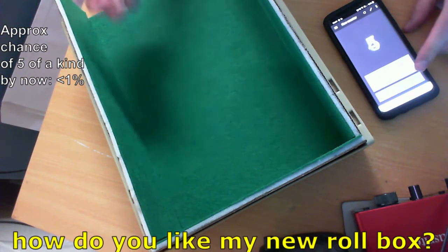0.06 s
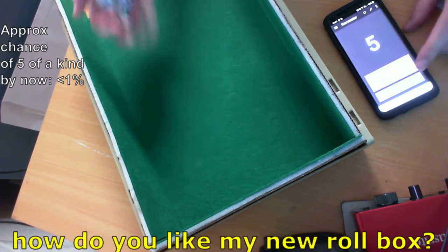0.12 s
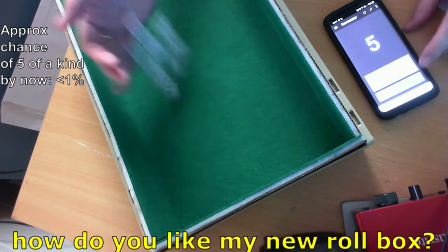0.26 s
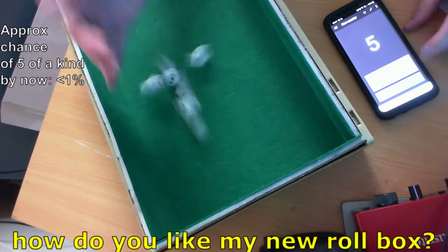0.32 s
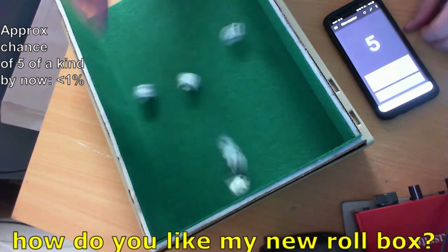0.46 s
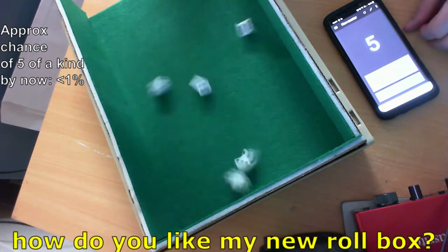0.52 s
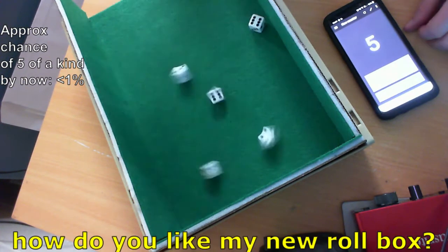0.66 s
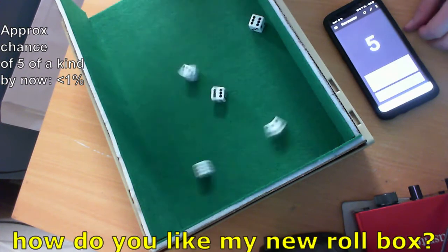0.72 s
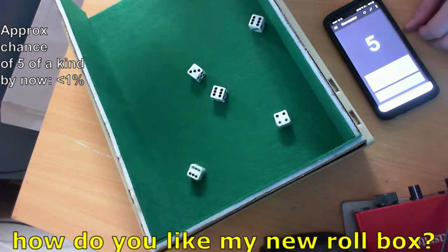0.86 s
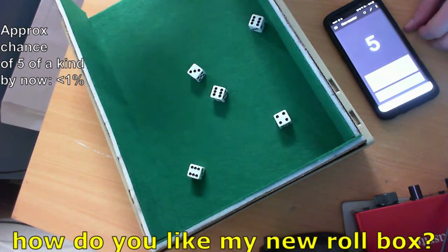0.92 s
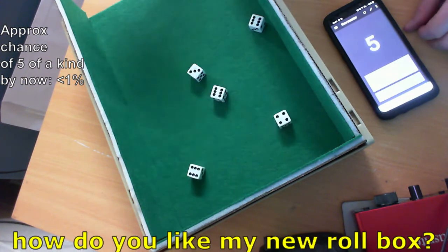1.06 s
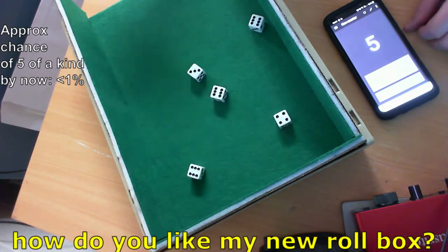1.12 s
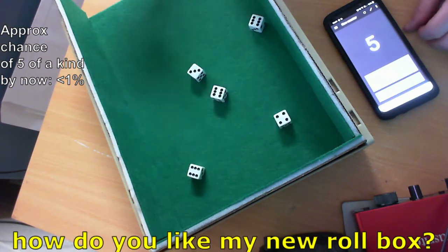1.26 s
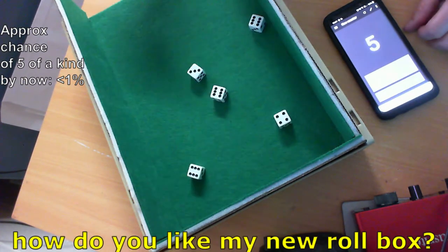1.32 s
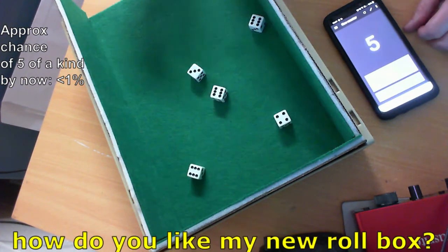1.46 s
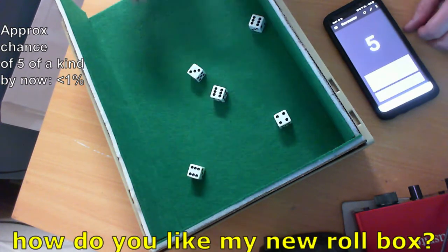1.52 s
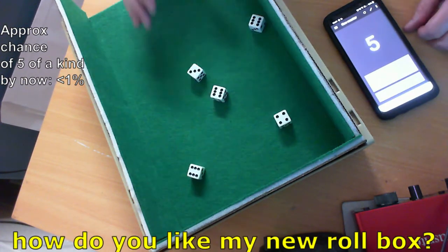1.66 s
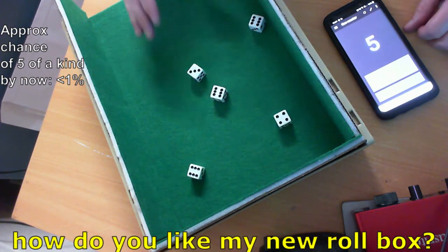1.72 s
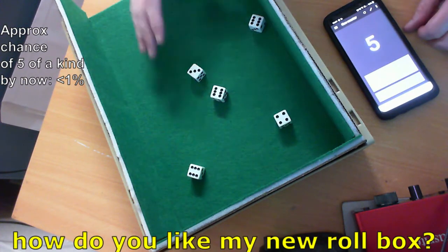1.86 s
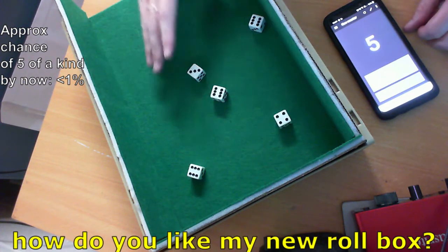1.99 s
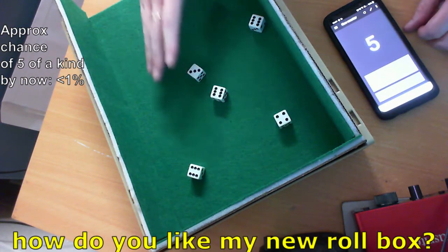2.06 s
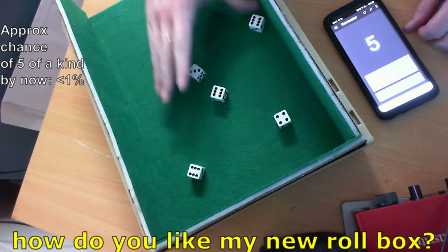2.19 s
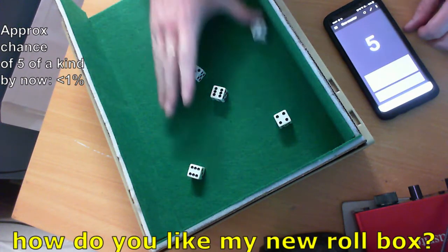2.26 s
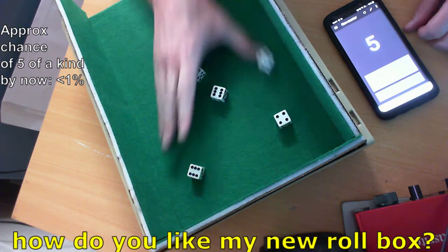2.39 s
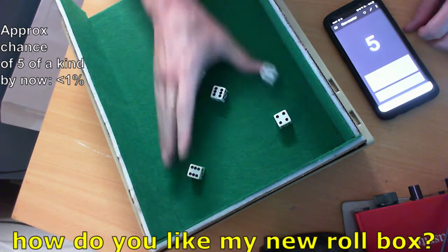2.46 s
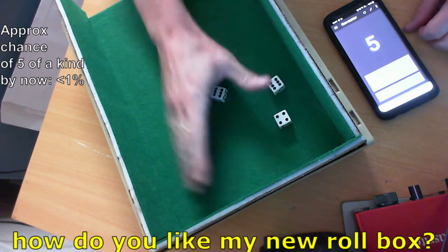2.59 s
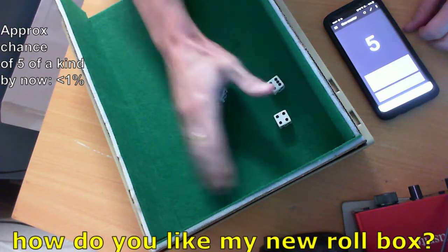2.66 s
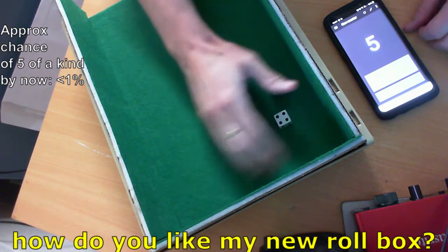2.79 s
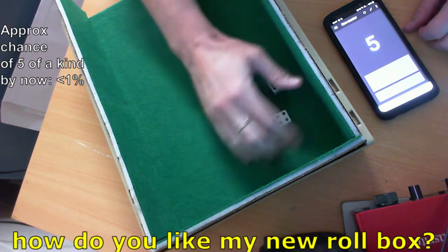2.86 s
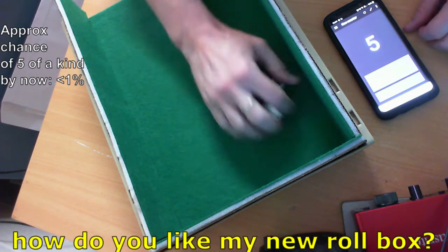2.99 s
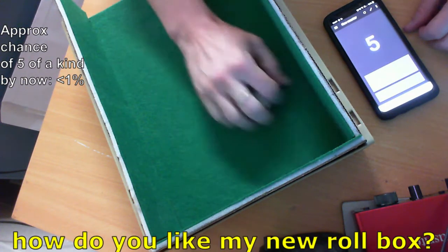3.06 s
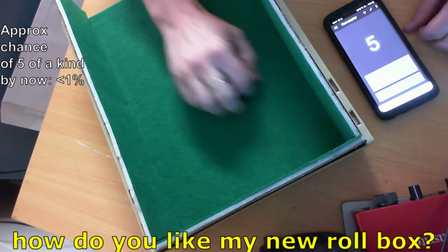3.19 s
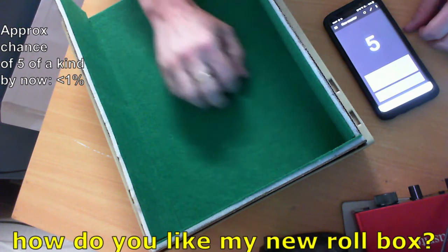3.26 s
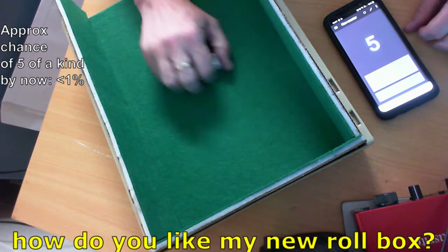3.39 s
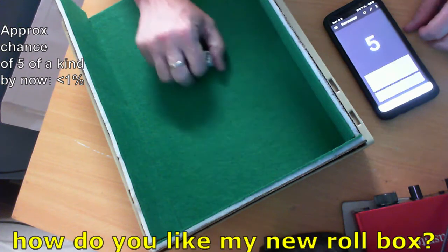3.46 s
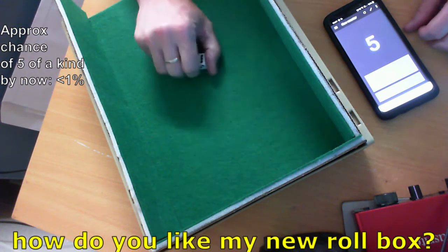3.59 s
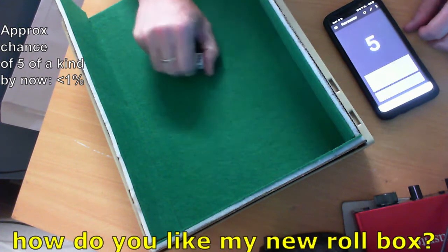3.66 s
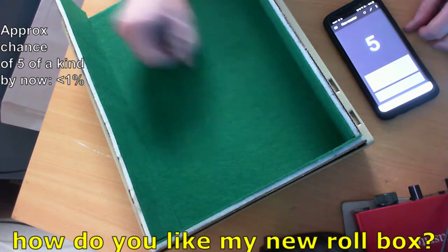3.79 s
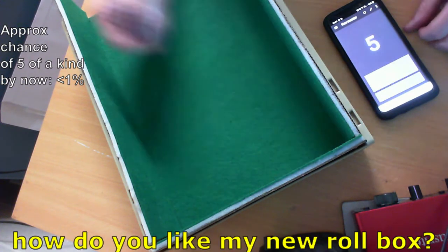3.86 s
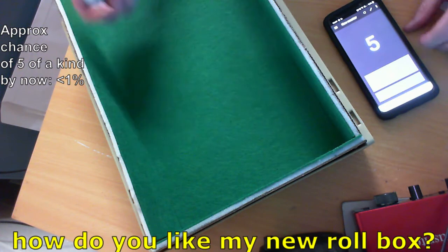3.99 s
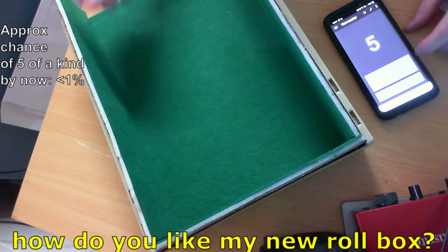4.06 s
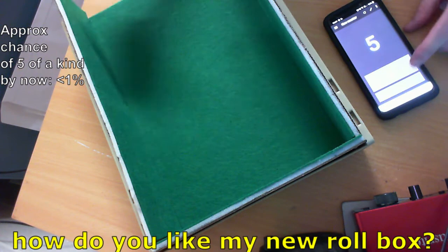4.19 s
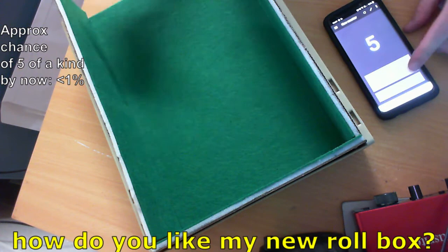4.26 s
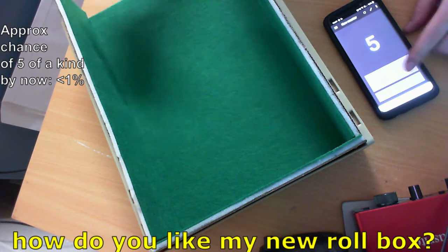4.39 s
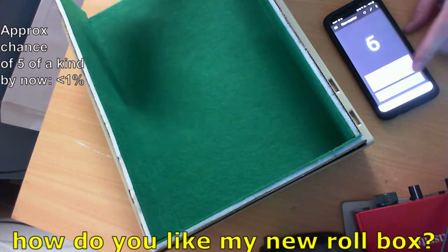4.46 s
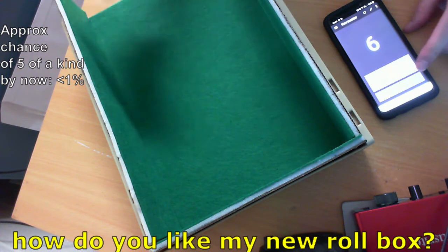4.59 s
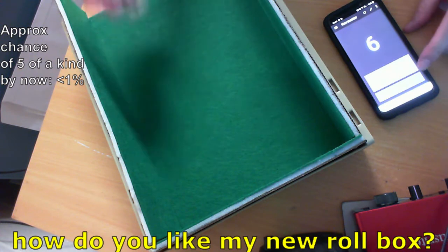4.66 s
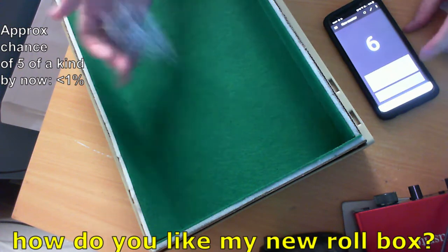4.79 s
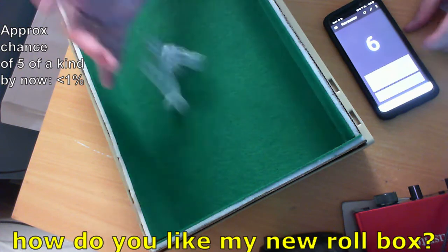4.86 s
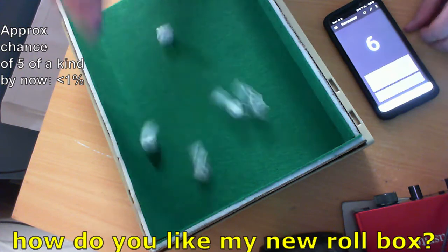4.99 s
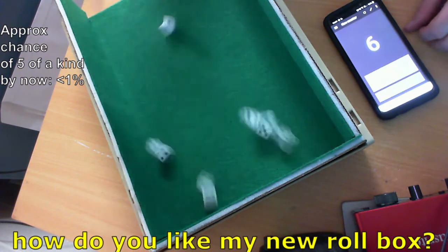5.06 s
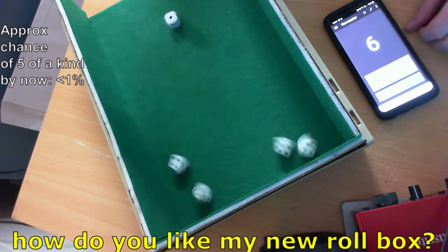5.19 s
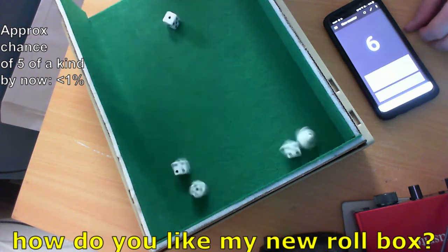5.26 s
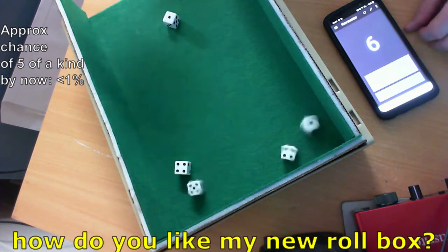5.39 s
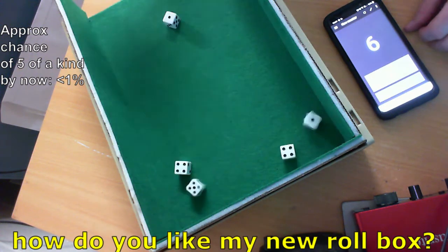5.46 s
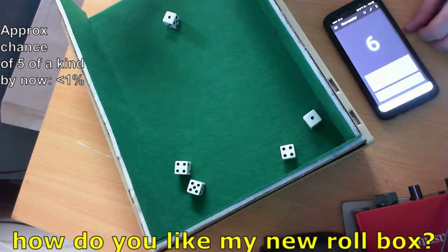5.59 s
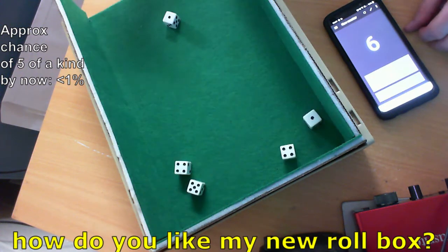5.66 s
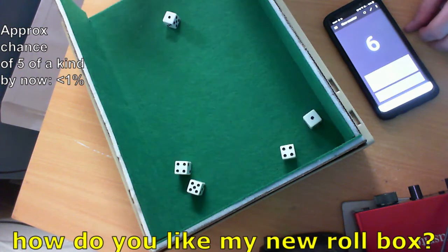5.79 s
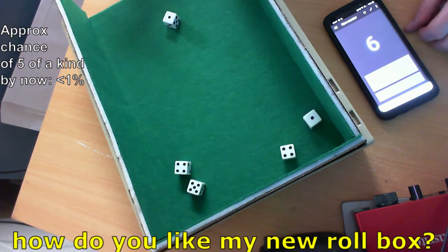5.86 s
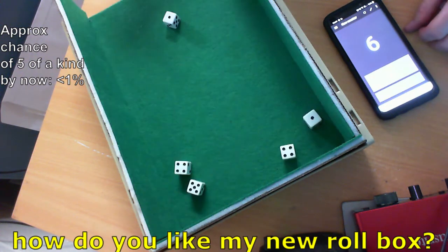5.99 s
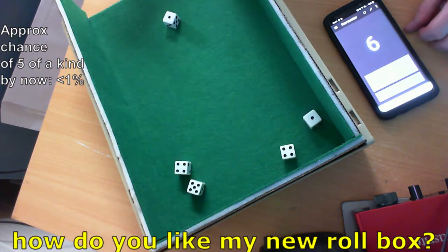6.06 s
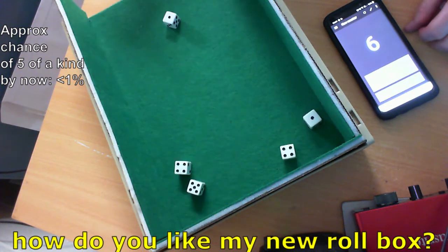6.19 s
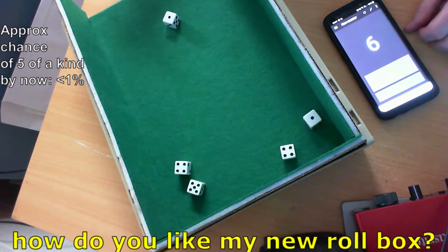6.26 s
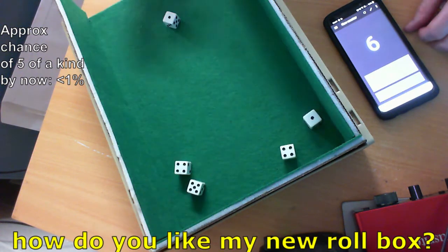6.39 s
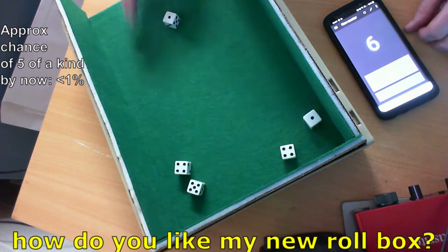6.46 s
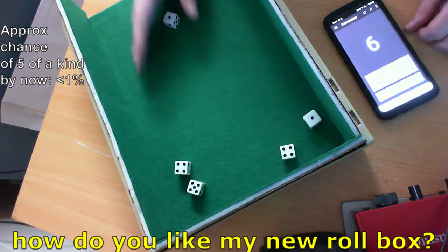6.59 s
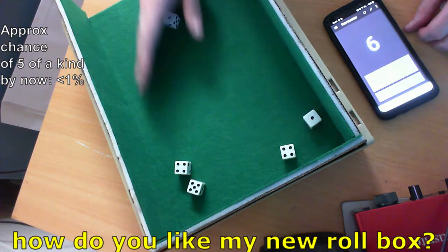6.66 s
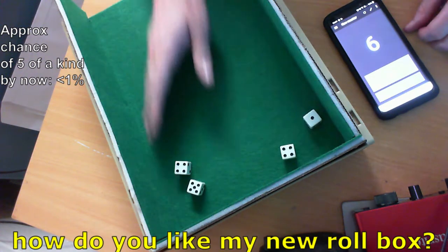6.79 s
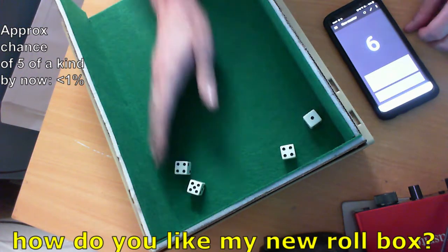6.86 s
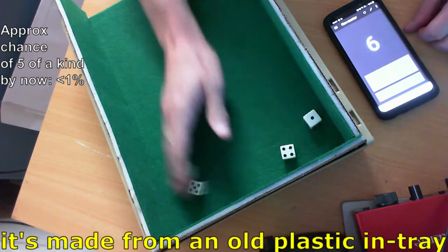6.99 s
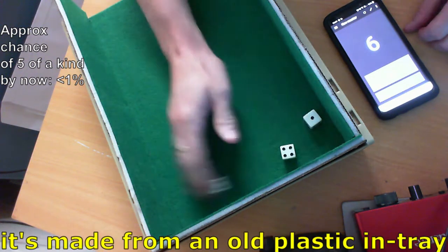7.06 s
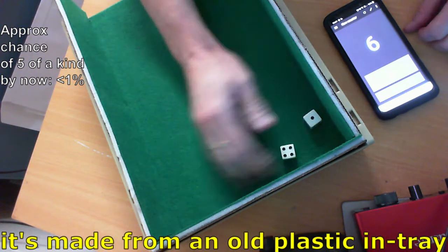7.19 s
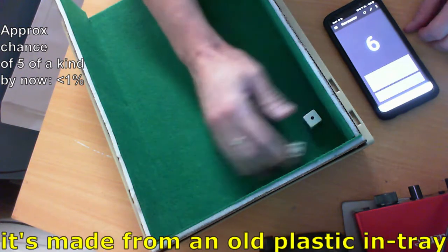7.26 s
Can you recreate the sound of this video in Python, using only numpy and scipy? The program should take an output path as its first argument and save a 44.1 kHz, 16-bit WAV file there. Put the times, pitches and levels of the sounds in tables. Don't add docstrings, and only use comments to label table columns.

```python
import sys
import numpy as np
from scipy import signal
from scipy.fft import rfft, irfft
from scipy.io import wavfile
from scipy.ndimage import uniform_filter1d

SR = 44100
rng = np.random.default_rng(int(sys.argv[2]) if len(sys.argv) > 2 else 0)


def convert_level_to_amplitude(level_db):
    exponent = np.asarray(level_db, float) / 20
    return 10 ** exponent


def inscribe(sig):
    pcm = np.round(np.clip(np.atleast_2d(sig).T, -1, 1) * 32767)
    wavfile.write(sys.argv[1], SR, pcm.astype(np.int16))


N = 323253
TIME = np.arange(N) / SR

# [f/Hz, level/dB per Hz]
RUB_HISS = [(1500, -11.5), (2000, -0.5), (2700, -6.5), (3600, -7), (4800, -8.5), (7200, -9), (8400, -15.5),
            (12000, -26), (16000, -48.5)]
# [f/Hz, level/dB, t60/s]
TRAY_BASS = [(104.9, -1.5, .45), (162, -11, 0.12), (218, -1, 0.29), (269, -5, 0.12), (291, -7, .15),
             (353, -1.5, 0.042), (428, -5, 0.15), (481, -6, 0.12), (546, -6, 0.11)]
# [f/Hz, level/dB, t60/s]
TRAY_BODY = [(581, -7, .1), (644, -11, 0.071), (724.4, -1, 0.17), (873, -4.5, 0.036), (958, -0.5, 0.054),
             (1130, 0, 0.067), (1263, 0, 0.052), (1415, -1, 0.094), (1540, 3.5, 0.038), (1667, -4.5, .05),
             (2005, -18.5, 0.081), (2250, -8, 0.091), (2470, -12, 0.0092), (3060, -12, 0.052)]
# [f/Hz, level/dB]
CLATTER = [(400, -8.5), (700, -7.5), (1200, 3), (1700, -4.5), (2000, -4), (3000, -17), (5000, -24.5),
           (9000, -35)]


def unit(x):
    return x / np.sqrt(np.mean(x ** 2))


def fade(t, t60):
    return np.exp(-np.log(1000) * t / t60)


def colour(x, spectrum):
    hz, db = np.transpose(spectrum)
    bins = np.arange(len(x) // 2 + 1) * SR / len(x) + 1
    gain = convert_level_to_amplitude(np.interp(np.log(bins), np.log(hz), db))
    return irfft(rfft(x) * gain, len(x))


def band(x, lo_hz, hi_hz):
    return signal.sosfilt(signal.butter(2, [lo_hz, hi_hz], "band", fs=SR, output="sos"), x)


def resonance(x, hz, width_hz):
    return unit(band(x, hz - width_hz / 2, hz + width_hz / 2))


def tone(hz, t):
    return np.sin(2 * np.pi * hz * t)


def add(out, s, sound):
    i = int(s * SR)
    out[i:i + len(sound)] += sound[:N - i]


def walk(rate):
    k = int(SR / rate)
    return uniform_filter1d(np.repeat(rng.standard_normal(N // k + 1), k), k)[:N]


def swell(start, length, db, attack, release, sag_db):
    t = TIME - start
    fall_db = sag_db * np.clip(t / length, 0, 1) - 30 * np.maximum(t - length, 0) / release
    return convert_level_to_amplitude(db + fall_db) * np.clip(t / attack, 0, 1)


def scatter(rate, spread_db):
    happens = rng.random(N) < rate / SR
    return happens * rng.choice([-1, 1], N) * convert_level_to_amplitude(spread_db * rng.exponential(size=N))


def ring(modes, push_s, centre_hz=1000):
    t = TIME[:SR // 3]
    hz, db, t60 = np.array(modes).T[:, :, None]
    sign, lift, detune = rng.standard_normal((3, len(modes), 1))
    weight = np.sign(sign) * convert_level_to_amplitude(db + 3 * lift - 9 * np.log2(hz / centre_hz) ** 2)
    sound = weight * fade(t, t60) * tone(hz * (1 + 0.011 * detune), t)
    push = np.hanning(int(push_s * SR) + 3)
    sound = signal.fftconvolve(sound.sum(0), push)[:len(t)]
    return sound / np.abs(sound).max()


def clatter(centre_hz):
    t = TIME[:SR // 3]
    near = [(hz, db - 6 * np.log2(hz / centre_hz) ** 2) for hz, db in CLATTER]
    noise = rng.standard_normal(len(t))
    crack = convert_level_to_amplitude(-19) * unit(band(noise, 1600, 5000))
    sound = (unit(colour(noise, near)) + crack) * fade(t, 0.051) * np.minimum(t / 0.0013, 1)
    return sound / np.abs(sound).max()


def through_tray(x, modes, centre_hz):
    place = rng.integers(0, 4, N)
    answers = [signal.fftconvolve(x * (place == k), ring(modes, 0.00012, centre_hz))[:N] for k in range(4)]
    return unit(sum(answers))


def clicks():
    # [t/s, peak level/dB, ring f/Hz, knock level/dB against the peak]
    shake_clicks = [(0.063, -37.5, 5900, -22), (0.072, -40, 4900, -26), (0.0761, -50, 5240, -19),
                    (0.101, -45, 4800, -19.5), (0.111, -31.5, 5200, -19.5), (0.1308, -25.5, 5900, -22),
                    (0.1336, -39, 5990, -19.5), (0.1783, -22, 7450, -32), (0.1967, -43, 6980, -30.5),
                    (3.8889, -41.5, 5950, -16.5), (3.9956, -45, 4900, -5), (4.0086, -27, 5930, -18.5),
                    (4.0101, -35, 6510, -15), (4.0265, -32, 5300, -11), (4.0292, -26.5, 6820, -19.5),
                    (4.0306, -31, 6600, -19.5), (4.0321, -22, 6000, -29), (4.033, -21.5, 7000, -15.5),
                    (4.0343, -26.5, 6700, -18), (4.0371, -19, 5250, -34), (4.0385, -20.5, 6560, -23.5),
                    (4.0408, -20.5, 6650, -24.5), (4.0419, -16, 7100, -20), (4.0455, -31, 6600, -22.5),
                    (4.047, -28, 6800, -21.5), (4.0518, -19, 6860, -16), (4.0558, -19.5, 6950, -22.5),
                    (4.06, -26, 6700, -18.5), (4.0703, -28.5, 6460, -28), (4.0772, -35, 5500, -20),
                    (4.084, -40, 6220, -14), (4.0906, -37, 5780, -14), (4.101, -43, 5200, -12),
                    (4.131, -42.5, 5000, -6), (4.11, -37, 6150, -11), (4.1193, -38, 4870, -25),
                    (4.6938, -33, 5630, -32), (4.7277, -34, 6450, -34.5)]
    # [t/s, peak level/dB, ring f/Hz, knock level/dB against the peak]
    throw_clicks = [(0.253, -4.5, 7300, -31), (0.2537, -8, 7670, -31.5), (0.2595, -15.5, 6500, -24),
                    (0.2708, -11, 6850, -21), (0.2984, -19, 6900, -35), (0.3128, -16.5, 5950, -31),
                    (0.4807, -15, 7150, -26), (0.4821, -24, 6360, -23), (0.5104, -26, 6360, -30),
                    (0.562, -54, 6680, -13), (4.7741, -30.5, 7160, -18), (4.7811, -27.5, 7140, -14.5),
                    (4.7851, -8.5, 7070, -19), (4.7856, -8.5, 6300, -23.5), (4.7888, -16.5, 6640, -21),
                    (4.791, -32, 6900, -18), (4.7944, -14.5, 6860, -16.5), (4.8228, -14.5, 6700, -21.5),
                    (4.8674, -39.5, 5800, 6), (4.872, -31, 7150, -13), (4.888, -39.5, 5400, 5.5),
                    (4.9002, -32, 7550, -8), (5.0109, -44, 7100, -4), (5.271, -36.5, 6050, -33)]
    # [t/s, peak level/dB, ring f/Hz, knock level/dB against the peak]
    gather_clicks = [(2.6653, -41.5, 6080, -7), (2.6934, -48.5, 6260, -6), (2.9462, -49, 7800, -19),
                     (2.9927, -45, 7550, -14), (3.048, -34, 7000, -5), (3.0567, -38, 6490, -12),
                     (3.0677, -35.5, 5400, -19), (3.0857, -28, 8050, -24), (3.0957, -33, 6660, -7),
                     (3.1244, -20.5, 7540, -32), (3.144, -28.5, 7300, -27), (3.2652, -25, 7160, -32),
                     (3.2774, -43, 7080, -25), (3.2791, -36, 6970, -26), (3.287, -36, 7400, -27),
                     (3.3574, -39, 6600, -6), (3.3655, -40, 6720, -14), (3.3742, -38.5, 6730, -9),
                     (3.4141, -40.5, 6640, -21.5), (3.4267, -39, 6560, -18), (3.4347, -34, 6140, -23),
                     (3.4366, -34, 6300, -8), (3.4392, -36, 6520, -15), (3.478, -41.5, 6440, -21),
                     (7.0203, -48.5, 7540, -6.5), (7.21, -25.5, 7240, -22)]
    palm_db = -10
    out, t = np.zeros(N), TIME[:SR // 50]
    for table, cup_db in (shake_clicks, 2.5), (throw_clicks, 3), (gather_clicks, 1):
        for s, db, hz, knock_db in table:
            noise = rng.standard_normal(len(t))
            burst = tone(hz, t) * np.exp(-(t / 0.00053) ** 2) * np.minimum(t / 0.00015, 1)
            snap = convert_level_to_amplitude(-5) * band(noise * fade(t, 0.0043), 3500, 8830)
            whole_die = tone(0.45 * hz, t) * np.exp(-(t / 0.00034) ** 2)
            knock = band(whole_die + 0.67 * noise * fade(t, 0.02), 1900, 5100)
            palm = band(noise * fade(t, 0.014), 700, 1900)
            low = convert_level_to_amplitude(knock_db + cup_db) * knock + convert_level_to_amplitude(knock_db + palm_db) * palm
            add(out, s + 0.0005, convert_level_to_amplitude(db + 2) * (burst + snap + low))
    return out


def thuds():
    # [t/s, peak level/dB, centre f/Hz, bass level/dB against the peak]
    first_throw = [(.243, -26.5, 1080, 2.5), (.2545, -25.5, 1160, 3), (.2605, -26, 995, -3),
                   (.266, -27.5, 1170, -1.5), (.285, -30.5, 705, -0.5), (.2955, -38, 1414, -8.5),
                   (0.305, -24, 1470, -25), (.313, -26.5, 714, 2), (.3205, -32.5, 790, -14),
                   (.33, -27.5, 1060, -26), (.343, -44, 930, -1), (.36, -35.5, 1500, 2),
                   (0.374, -34.5, 900, 6), (.412, -40, 1130, -12), (.424, -32.5, 1050, -1),
                   (.468, -40.5, 1130, -15), (.488, -40, 785, -7), (0.522, -51.5, 750, 11),
                   (.552, -47, 740, -2), (.5055, -41, 1340, -2), (0.572, -49, 1280, 4), (.581, -43, 760, 6),
                   (.616, -35.5, 725, 2), (.681, -51, 1560, -10), (0.701, -42, 1124, 0),
                   (0.742, -44, 892, 8), (0.782, -42.5, 957, -13), (.812, -53.5, 1320, -16),
                   (.823, -56.5, 933, -8), (0.85, -56, 1130, -14)]
    # [t/s, peak level/dB, centre f/Hz, bass level/dB against the peak]
    second_throw = [(4.7825, -32, 800, 3), (4.786, -17.5, 1247, -12.5), (4.7915, -28, 1030, -6),
                    (4.7985, -25, 900, -2), (4.807, -25, 780, 3), (4.843, -30.5, 900, 11),
                    (4.8565, -26.5, 1160, 4), (4.8675, -23.5, 1110, -7), (4.877, -19, 750, -5),
                    (4.891, -22.5, 800, -5), (4.9, -22, 995, -7), (4.9035, -27, 920, -2),
                    (4.9085, -22.5, 700, -18), (4.9355, -40, 900, -2), (4.958, -33, 1330, 0),
                    (4.9795, -22, 1270, -9.5), (4.993, -41, 900, 15), (5.0135, -41, 1230, -14),
                    (5.044, -29.5, 1250, -12), (5.06, -37.5, 1274, -6), (5.08, -37, 1400, -2),
                    (5.0895, -35, 770, 3), (5.108, -36, 1420, -15), (5.138, -34.5, 818, 2.5),
                    (5.152, -32.5, 880, -15), (5.1595, -39, 1200, 0), (5.194, -41.5, 960, -8),
                    (5.202, -43.5, 950, -7), (5.241, -38, 1560, 1), (5.271, -50.5, 926, 0.5),
                    (5.288, -43, 1136, -2), (5.334, -47.5, 928, 2), (5.356, -51, 1150, -10),
                    (5.379, -51, 1200, -7), (5.4, -34, 1210, -16), (5.453, -58.5, 1135, 7.5)]
    # [t/s, peak level/dB, centre f/Hz, bass level/dB against the peak]
    nudges = [
        (2.273, -48.5, 1456, -27),
        (3.057, -43, 1480, -27),
        (3.087, -38, 1520, -33),
        (3.433, -45, 1330, -26),
        (3.125, -45, 1300, -20),
        (7.2107, -53, 1500, 4),
    ]
    out = np.zeros(N)
    grip = fade(TIME[:SR // 3], 0.04) + convert_level_to_amplitude(-6.5)
    for s, db, hz, bass_db in first_throw + second_throw + nudges:
        body = ring(TRAY_BODY, push_s=0.00049, centre_hz=hz) + convert_level_to_amplitude(-4) * clatter(hz)
        spot = convert_level_to_amplitude(-5) * ring([(hz, 0, 0.06)], push_s=0.00096, centre_hz=hz)
        bass_hz = 343.7 * 2 ** (0.045 * (db + 30))
        bass = ring(TRAY_BASS[1:], push_s=0.0017, centre_hz=bass_hz)
        add(out, s, convert_level_to_amplitude(db - 5) * grip * (body + spot + convert_level_to_amplitude(bass_db - 2) * bass))
    return out


def thumps():
    # [t/s of deepest push, peak level/dB, f/Hz]
    slaps = [(0.2465, -35, 278), (.2521, -22, 280), (.259, -17, 297), (0.2645, -40, 300), (.2822, -36, 221),
             (0.2866, -25, 330), (.3056, -23.5, 322), (0.314, -25.5, 383), (0.3747, -35, 328),
             (0.3797, -37, 370), (4.7992, -27, 332), (4.8077, -37, 360), (4.8588, -22, 327),
             (4.8642, -34, 420), (4.8697, -18, 404), (4.8892, -22, 309), (4.9008, -25.5, 362),
             (4.908, -26, 390), (4.9839, -39, 337), (4.9937, -31, 287), (5.0027, -39, 251),
             (5.244, -44, 350)]
    lead_s, cycles = 1 / 50, 0.52
    out, t = np.zeros(N), TIME[:SR // 25] - lead_s
    for s, db, hz in slaps:
        swing = np.cos(2 * np.pi * hz * t) * np.exp(-(t * hz / cycles) ** 2)
        add(out, s - lead_s, -convert_level_to_amplitude(db) * swing)
    return out


def flexes():
    # [t/s, peak level/dB]
    blows = [(0.254, -34), (0.311, -52), (0.369, -40.5), (0.411, -43), (0.514, -41), (0.561, -49),
             (0.614, -55), (0.71, -50.5), (0.775, -45), (4.799, -38), (4.857, -41), (4.899, -48),
             (4.974, -44), (5.043, -43.5), (5.087, -54), (5.149, -48), (5.237, -55.5), (5.403, -62)]
    swing, t = np.zeros(N), TIME[:SR // 3]
    for s, db in blows:
        add(swing, s, convert_level_to_amplitude(db + 5) * np.minimum(t / 0.012, 1) * fade(t, 0.22))
    lowest_hz = TRAY_BASS[0][0]
    return swing * np.sin(2 * np.pi * lowest_hz * TIME + 0.6 * walk(12))


def tumbles():
    # [start t/s, length/s, level/dB]
    rolls = [
        (0.3, .53, -56.5),
        (4.858, 0.632, -57),
        (4.82, 0.088, -49),
        (.25, .06, -51.5),
    ]
    gain = sum(swell(*roll, attack=0.053, release=0.12, sag_db=-10) for roll in rolls)
    patter = scatter(rate=810, spread_db=4)
    body = through_tray(patter, TRAY_BODY, centre_hz=1116) + convert_level_to_amplitude(-3.5) * unit(colour(patter, CLATTER))
    bass = through_tray(patter, TRAY_BASS, centre_hz=211)
    hiss = unit(colour(rng.standard_normal(N), RUB_HISS))
    return gain * (body + convert_level_to_amplitude(5.5) * bass + convert_level_to_amplitude(-16) * hiss)


def rubs():
    # [start t/s, length/s, level/dB, hollow centre f/Hz, rasp level/dB]
    strokes = [(1.358, 0.035, -70.5, 1210, -10.5), (1.918, 0.073, -58.5, 1193, -9.5),
               (2.039, 0.061, -59.5, 1270, -10), (2.172, 0.091, -71.5, 1330, -4),
               (2.261, 0.087, -58, 1330, -14.5), (2.32, 0.085, -56.5, 1250, -8.5),
               (2.439, 0.21, -59, 1330, -9.5), (2.705, 0.15, -61.5, 1240, -7),
               (2.87, 0.8, -60.5, 1330, -9.5), (3.033, 0.16, -55, 1490, -8), (3.196, 0.28, -58, 1200, -6),
               (3.57, 0.081, -68, 1340, -7), (3.875, 0.06, -81, 1220, 10), (4.374, 0.025, -71, 1143, -20),
               (6.263, 0.16, -78, 1107, -6), (6.474, 0.31, -57.5, 1060, -9.5), (6.735, .025, -60, 1080, -7),
               (6.748, 0.019, -50.5, 1120, -13), (6.77, 0.075, -56.5, 1220, -5.5),
               (6.834, 0.31, -59.5, 1340, -8.5), (7.078, 0.096, -58, 1180, -6.5),
               (7.182, 0.11, -59.5, 1400, -8)]
    # [f/Hz, width/Hz, level/dB]
    hollow = [(736, 30, -3.5), (904, 102, -6), (984.4, 116, -1.5), (1130, 220, 0.5), (1330, 88, -3),
              (1564, 193, -1.5), (1714, 384, -4.5)]
    # [f/Hz, width/Hz, level/dB]
    scrapes = [(2160, 890, -1), (2636, 600, -3), (3060, 450, -6), (3530, 590, -9.5)]
    # [start t/s, length/s, level/dB]
    leaning = [
        (1.91, 0.15, -67.5),
        (2.3, 0.13, -75),
        (2.855, 0.11, -75.5),
        (3.095, 0.29, -67.5),
        (6.507, 0.56, -76),
        (7.14, .3, -70),
    ]
    gains = np.array([swell(*row[:3], attack=0.011, release=0.094, sag_db=-3) for row in strokes])
    gain = gains.max(0)
    settings = np.transpose(strokes)[3:, gains.argmax(0)]
    centre_hz, rasp_db = uniform_filter1d(settings, SR // 30)
    centre_hz = centre_hz * 2 ** (0.06 * walk(7))
    fibres = scatter(rate=3000, spread_db=1.58) * convert_level_to_amplitude(0.7 * walk(45))
    body = 0
    for hz, width_hz, db in hollow:
        shade_db = 2.6 * walk(14) - 14 * np.log2(hz / centre_hz) ** 2
        body = body + convert_level_to_amplitude(db + shade_db) * resonance(fibres, hz, width_hz)
    scrape = sum(convert_level_to_amplitude(db + 3 * walk(11)) * resonance(fibres, hz, width_hz) for hz, width_hz, db in scrapes)
    rasp = convert_level_to_amplitude(2.7 * walk(12)) * unit(colour(fibres, RUB_HISS)) + convert_level_to_amplitude(-7) * scrape
    weight = sum(swell(*lean, attack=0.097, release=0.23, sag_db=-0.5) for lean in leaning)
    bass = weight * through_tray(fibres, TRAY_BASS[1:], centre_hz=360)
    return gain * (convert_level_to_amplitude(-2) * body + convert_level_to_amplitude(rasp_db + 2.5) * rasp) + bass


def room(x):
    # [f/Hz, level/dB]
    tail_colour = [(300, 0.5), (1500, -7.5), (3000, -3), (5000, -5.5), (7000, -6.5), (9000, -4),
                   (13000, -21)]
    # [lag t/s, level/dB]
    near_echoes = [
        (.0012, -30),
        (.0024, -25.5),
        (.006, -31.5),
    ]
    t = TIME[:SR // 2]
    answer = np.zeros(len(t))
    for t60, db in (0.061, -12), (0.34, -19):
        tail = colour(rng.standard_normal(len(t)), tail_colour) * fade(t, t60) * np.minimum(t / 0.0025, 1)
        answer += convert_level_to_amplitude(db) * tail / np.sqrt(np.sum(tail ** 2))
    for lag, db in near_echoes:
        answer[int(lag * SR)] += convert_level_to_amplitude(db)
    return x + signal.fftconvolve(x, answer)[:N]


def cricket():
    # [start t/s, level/dB]
    chirps = [
        (1.689, -66.5),
        (3.962, -71),
        (4.03, -70.5),
        (6.48, -67),
    ]
    wing, t = np.zeros(N), TIME[:SR // 3]
    pulse = np.minimum(t / 0.0066, 1) * fade(t, 0.3)
    for s, db in chirps:
        for k in range(3):
            add(wing, s + k * 0.064, convert_level_to_amplitude(db - 1.5 * k) * pulse)
    return wing * convert_level_to_amplitude(2 * walk(50)) * resonance(rng.standard_normal(N), 5000, 160)


def whine():
    frame_hz, first_gap_s, gap_s = 15, 0.028, 0.0118
    reading = (TIME - first_gap_s) % (1 / frame_hz) > gap_s
    gate = uniform_filter1d(uniform_filter1d(reading * 1., 50), 50)
    return np.sqrt(2) * gate * convert_level_to_amplitude(-57 + 0.5 * walk(20)) * tone(13171, TIME)


def background():
    # [f/Hz, level/dB per Hz]
    air_colour = [(9, -28.5), (15, -19.5), (20, -28.5), (33, -29), (60, -32.5), (100, -29), (150, -34.5),
                  (400, -39.5), (860, -42.5), (2500, -50.5), (5850, -52.5), (12500, -52.5), (14000, -39.5),
                  (16000, -55.5), (22000, -61.5)]
    # [f/Hz, level/dB rms]
    circuit_lines = [(4936, -93), (6584, -94), (8000, -95), (9650, -94), (9880, -99)]
    air = colour(rng.standard_normal(N), air_colour)
    air = air * convert_level_to_amplitude(-70) / np.std(band(air, 200, 17000))
    hum = np.sqrt(2) * convert_level_to_amplitude(-70.5 + walk(11)) * np.sin(2 * np.pi * 120 * TIME + 0.26 * walk(1.8))
    lines = sum(np.sqrt(2) * convert_level_to_amplitude(db) * tone(hz, TIME) for hz, db in circuit_lines)
    return air + hum + lines


def scene():
    dice = room(clicks() + thuds() + thumps()) + flexes() + tumbles() + rubs()
    dice = signal.sosfilt(signal.butter(4, 96, "high", fs=SR, output="sos"), dice)
    return (dice + cricket() + background() + whine())[None]


def top_cut(x):
    return signal.sosfilt(signal.butter(12, 16660, fs=SR, output="sos"), x)


def record(dry):
    clip_at, unevenness, top_hz, offset = 0.24, 14, 15800, -0.0041
    rounded = clip_at * np.tanh(dry / clip_at)
    one_sided = unevenness * uniform_filter1d(band(rounded, 3000, 12000) ** 4, size=24)
    low_pass = signal.ellip(8, 0.2, 60, top_hz, fs=SR, output="sos")
    return top_cut(signal.sosfilt(low_pass, rounded + one_sided) + offset)


dry = scene()
out = record(dry)
inscribe(out)
```